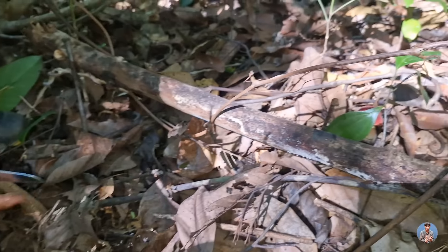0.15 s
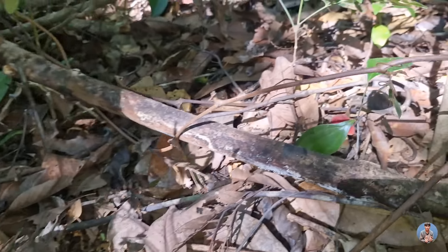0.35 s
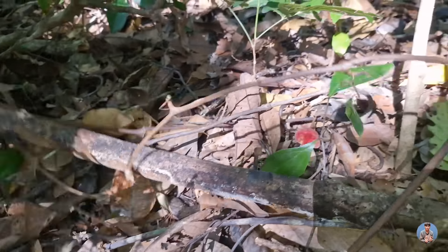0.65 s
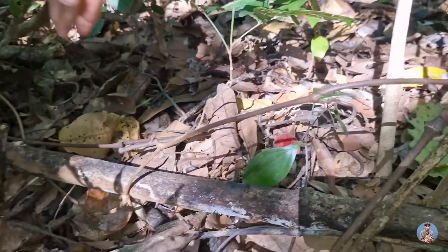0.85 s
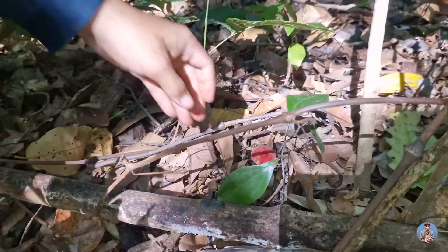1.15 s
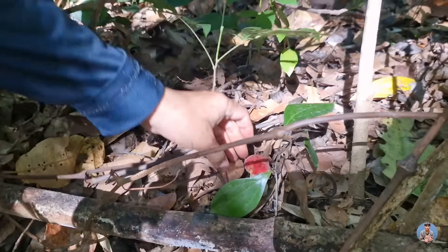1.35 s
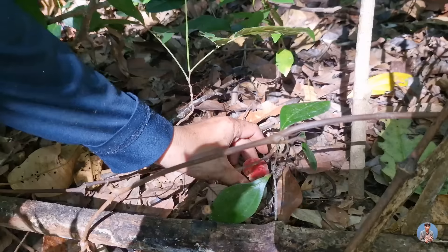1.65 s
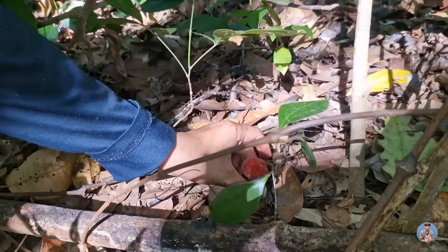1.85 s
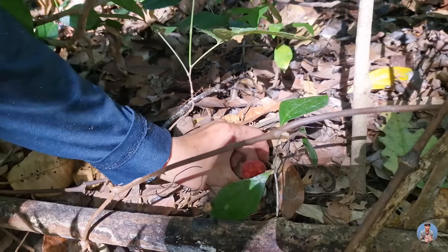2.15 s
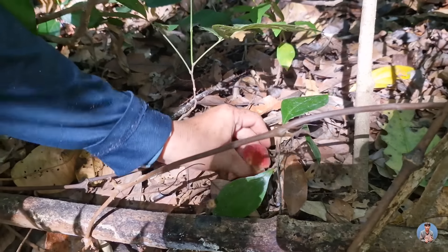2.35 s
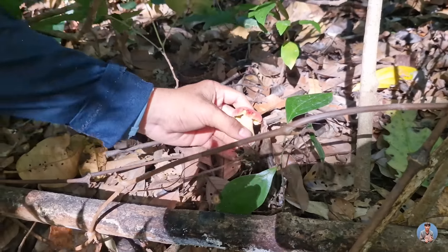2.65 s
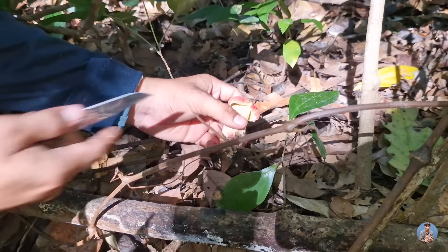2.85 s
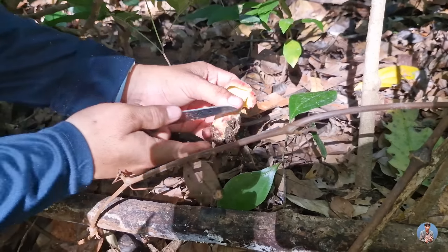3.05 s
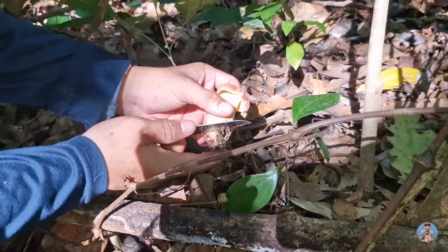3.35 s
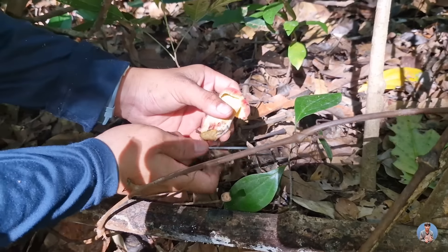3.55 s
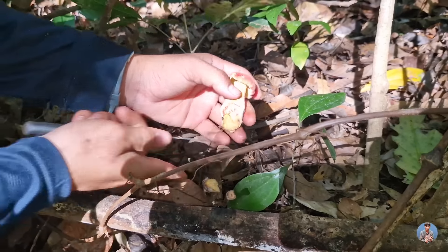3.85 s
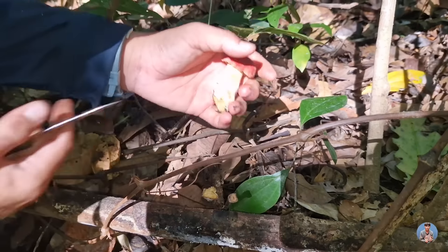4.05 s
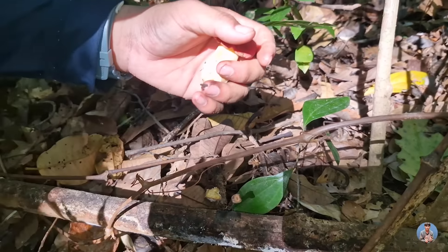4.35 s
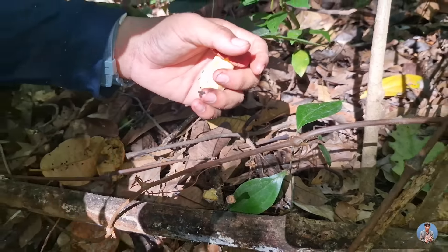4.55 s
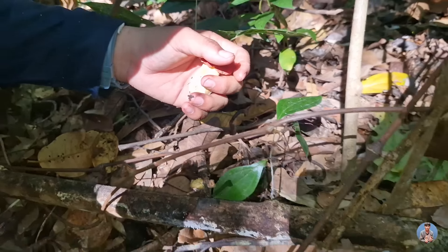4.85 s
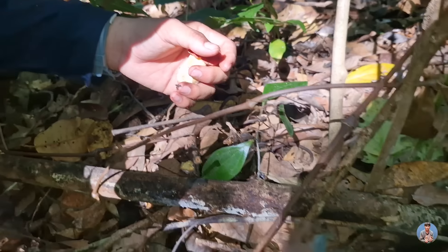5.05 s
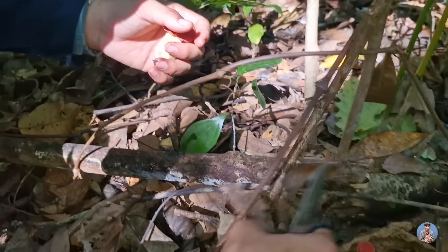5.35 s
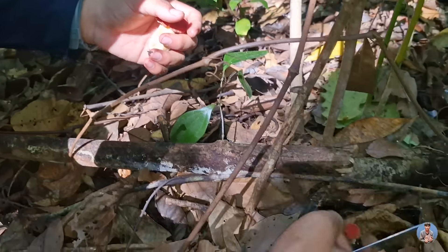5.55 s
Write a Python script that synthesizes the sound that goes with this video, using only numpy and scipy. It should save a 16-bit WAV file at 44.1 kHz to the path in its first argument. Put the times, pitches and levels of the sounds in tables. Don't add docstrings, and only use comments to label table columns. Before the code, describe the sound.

Outdoors under trees, brittle leaves rub, crackle and snap as hands pick at the ground. Tiny bright ticks, springing scraps and dull soil knocks punctuate the rustle. Activity thins after three seconds, a pulsing cicada and a steady hiss emerge, then hard crisp cracks resume near five seconds.

```python
import sys
import numpy as np
from scipy import signal
from scipy.fft import rfft, irfft, next_fast_len
from scipy.io import wavfile
from scipy.ndimage import uniform_filter1d, map_coordinates

SR = 44100
rng = np.random.default_rng(int(sys.argv[2]) if len(sys.argv) > 2 else 0)


def elevation(decibels):
    levels = np.asarray(decibels, float)
    return 10 ** (levels / 20)


def persist_wave(psi):
    counts = np.round(np.clip(psi, -1, 1) * 32767).astype(np.int16)
    wavfile.write(sys.argv[1], SR, np.atleast_2d(counts).T)


N = 250488
TIME = np.arange(N) / SR
SIDES = np.array([[.5], [-.5]])


def along(points, hz):
    point_hz, value = np.transpose(points)
    return np.interp(np.log(hz + 1), np.log(point_hz + 1), value)


def unit(x):
    return x / np.sqrt(np.mean(x ** 2) + 1e-20)


def curves(rows):
    s, *columns = np.transpose(rows)
    return [np.interp(TIME, s, column) for column in columns]


def wobble(rate):
    coarse = TIME[::32]
    knots = rng.standard_normal(int(N * 100 / SR))
    return np.interp(TIME, coarse, map_coordinates(knots, [coarse * np.clip(rate, .1, 95)]))


def filtered(x, response):
    size = next_fast_len(x.shape[-1] + 4096, real=True)
    spectrum = rfft(x, size) * response(np.fft.rfftfreq(size, 1 / SR))
    return irfft(spectrum, size)[..., :x.shape[-1]]


def shaped(spectrum):
    return lambda hz: elevation(along(spectrum, hz))


def peaks(modes):
    def response(f):
        total = 0
        for centre, width, db in modes:
            damping = (f * width) ** 2
            total = total + elevation(db) * (damping / ((centre ** 2 - f ** 2) ** 2 + damping)) ** 1.5
        return total
    return response


# pitch_hz, likeness (0 to 1)
LIKENESS = [(60, 0.69), (300, 0.81), (700, 0.87), (1400, 0.58), (3000, 0.13), (6000, 0.066), (12000, 0.025)]


def rush(response, lead=9.96):
    size = next_fast_len(N, real=True)
    hz = np.fft.rfftfreq(size, 1 / SR)
    a, b, c, d = rng.standard_normal((4, len(hz)))
    turn = np.arccos(np.clip(along(LIKENESS, hz), -1, 1)) / 2
    pair = np.cos(turn) * (a + 1j * b) + 2 * SIDES * np.sin(turn) * (c + 1j * d)
    pair *= response(hz) * np.exp(2j * np.pi * hz * lead / SR * SIDES)
    return unit(irfft(pair, size)[:, :N])


def humps(times, sizes, lengths, rise=0.47, fall=0.28):
    t = np.arange(-lengths.max() * SR // 2, lengths.max() * SR * 3).astype(int)
    u = t / (lengths[:, None] * SR) - .36
    shape = np.where(u < 0, np.exp(-(u / rise) ** 2), np.exp(-np.abs(u) / fall))
    where = np.clip((times * SR).astype(int)[:, None] + t, 0, N)
    power = (sizes[:, None] ** 2 * shape).ravel()
    return np.sqrt(np.bincount(where.ravel(), power, N + 1)[:N])


def tone(s, hz, width_hz):
    pitch = hz[np.clip(np.searchsorted(s - .004, TIME) - 1, 0, None)]
    turn = np.exp(2j * np.pi * np.cumsum(pitch) / SR)
    a, b, c = filtered(rng.standard_normal((3, N)), lambda f: 1 / (1 + (f / width_hz) ** 4))
    return unit(np.real(turn * (a + 1j * np.array([b, c]))))


def halves(x):
    x = unit(x)
    split_hz = 7500
    dull = filtered(x, lambda hz: 1 / (1 + (hz / split_hz) ** 8))
    return dull, (x - dull) * elevation(-1.5 * SIDES)


# pitch_hz, level_db (per Hz)
RUMBLE_COLOUR = [(15, -39), (25, -4), (54, 10.5), (91, -5), (119, 5), (173, -5), (200, -5.5), (260, -10.5),
                 (440, -120)]
# pitch_hz, level_db (per Hz)
HUSH_COLOUR = [(90, -5.5), (150, -12.5), (600, -15), (1500, -20), (4000, -15), (10500, -23), (13400, -28),
               (16000, -26)]
# start_s, level_db
WEIGHT_SHIFTS = [
    (0.0, -39),
    (0.255, -61),
    (0.285, -32),
    (0.345, -50),
    (0.54, -33.5),
    (0.9, -50.5),
    (4.56, -55),
    (4.6, -48.5),
    (5.68, -51),
]


def forest():
    rumble_db = curves(WEIGHT_SHIFTS)[0] + 2.0 * wobble(31)
    rumble = elevation(rumble_db) * rush(shaped(RUMBLE_COLOUR), lead=3.0)
    hush_db = -55.0 + 1.5 * wobble(2.66)
    return rumble + elevation(hush_db) * rush(shaped(HUSH_COLOUR), lead=3.0)


# pitch_hz, width_hz, level_db
PULSER_NOTES = [(2250, 900, -6), (2640, 670, -2)]
# pitch_hz, width_hz, level_db
HISSER_NOTE = [(6000, 650, 0)]
# start_s, level_db
CHORUS_LEVEL = [
    (0, -49),
    (1.5, -53),
    (2.3, -55),
    (3.1, -61),
    (3.7, -55.5),
    (3.95, -47),
    (4.6, -47.5),
    (5.68, -59),
]


def cicadas():
    phase = ((TIME - 3.995) * 4.22) % 1

    def pulse(swell, fade):
        return 0.16 + (1 - np.exp(-phase / swell)) * np.exp(-(phase / fade) ** 2)

    buzz_db = 2.2 * wobble(80)
    low, high = (rush(peaks([note]), lead=2.0) for note in PULSER_NOTES)
    notes = elevation(2.5) * pulse(0.12, 0.6) * low + elevation(0.5) * pulse(0.028, 0.49) * high
    pulser = unit(elevation(buzz_db)) * notes
    waver_db = 1.8 * wobble(9)
    hisser = elevation(-5.5 + waver_db) * rush(peaks(HISSER_NOTE), lead=1.7)
    return elevation(curves(CHORUS_LEVEL)[0]) * (pulser + hisser)


def rings(times, sizes, hz, cycles, lag):
    t = np.arange(96) / SR
    out = []
    for side, size in zip((.5, -.5), sizes):
        decay = np.exp(-t * hz[:, None] / cycles)
        wave = size[:, None] * np.sin(2 * np.pi * hz[:, None] * t) * decay
        start = (times * SR - side * lag).astype(int)[:, None] + np.arange(len(t))
        out.append(np.bincount(np.clip(start, 0, N).ravel(), wave.ravel(), N + 1)[:N])
    return np.array(out)


# pitch_hz, level_db (per Hz)
LEAF_COLOUR = [(1000, -27), (1780, -13.5), (1970, -6.5), (2250, -2), (2600, -6.5), (3220, -4), (4460, 0),
               (6710, -4), (8780, -3.5), (10600, -8.5), (13100, 1), (14000, -4), (15600, -12)]


def crackle(share_db, cycles, spread_db):
    when, strength, pitch, place = rng.random((7000, 4)).T
    size = elevation(-spread_db * np.log(strength + .004)) * elevation(SIDES * 16 * (place - .5))
    cracks = rings(when * N / SR, size, 1800 * 8 ** pitch, cycles, lag=6 + 8 * place)
    grains = unit(filtered(cracks, shaped(LEAF_COLOUR)))
    return rush(shaped(LEAF_COLOUR)) + elevation(share_db) * grains


def patchy(x, depth_db):
    z = signal.stft(x, nperseg=256)[2]
    field = uniform_filter1d(rng.standard_normal(z.shape[1:]), size=9, axis=0)
    field = uniform_filter1d(field, size=14, axis=1)
    return signal.istft(z * elevation(depth_db * unit(field)), nperseg=256)[1][:, :N]


# start_s, rustle_db, weight_db
BUSY_HANDS = [(0.0, -43, 4), (0.6, -27.5, 2), (0.94, -32, -2.5), (1.25, -27, -4), (1.5, -34, 9),
              (1.69, -40.5, 3), (2.01, -42, 1), (2.27, -40, 1.5), (2.45, -25.5, -1.5), (2.79, -34.5, -1.5),
              (3.11, -37, -5.5), (3.36, -51.5, -2), (3.7, -54, 4.5), (3.76, -32, -1.5), (4.09, -47, -3),
              (4.36, -47.5, -6), (4.65, -35, -0.5), (5.68, -30.5, 1)]
# full_contact_s, hold_s, rustle_db, body_db and soil_db (both over the rustle)
HAND_STROKES = [(0.302, 0.16, -28, -11, -3.5), (0.526, 0.21, -16.5, -9.5, -8.5),
                (0.743, 0.058, -32, 3.5, 4), (1.322, .13, -23, -8, -9.5), (1.534, 0.012, -27.5, 1.5, -17),
                (1.823, 0.05, -32, -3, -22), (1.95, 0.014, -40.5, 7, -19), (2.066, 0.026, -31.5, -1, -12),
                (2.18, 0.021, -39, 11, -2), (2.38, 0.17, -28.5, -2.5, -8.5), (2.893, 0.033, -23.5, -5, -12),
                (3.031, 0.048, -30.5, -6.5, -9.5), (3.255, 0.044, -42.5, -9.5, -7),
                (3.402, 0.1, -41, -9, -15), (3.592, 0.04, -40, -10, -16), (3.744, 0.016, -33, -7, -29),
                (4.7, 0.05, -28, -2.5, -32), (4.828, .1, -20.5, -3.5, -18), (4.929, 0.14, -16, -9.5, -14.5),
                (5.067, 0.043, -26.5, -5, -11), (5.13, 0.13, -18.5, -4, -10),
                (5.306, 0.12, -21.5, -10, -4.5), (5.493, 0.018, -37.5, -13, 6), (5.653, .06, -25.5, 2, -3)]


def stir():
    press_db_per_s, lift_db_per_s = 409, 273
    busy_body_db, busy_soil_db = -3.5, -7.5
    busy_db, weight_db = curves(BUSY_HANDS)
    s, hold, db, body_db, soil_db = np.transpose(HAND_STROKES)[..., None]
    before = np.maximum(s - TIME, 0)
    after = np.maximum(TIME - s - hold, 0)
    stroke_db = db - press_db_per_s * before - lift_db_per_s * after
    stroke, busy = elevation(2 * stroke_db).T, elevation(2 * busy_db)
    total = busy + stroke.sum(axis=1)

    def blend(steady_db, each_db):
        power = busy * elevation(2 * (steady_db + weight_db)) + stroke @ elevation(2 * each_db[:, 0])
        return 10 * np.log10(power / total)

    body, soil = blend(busy_body_db, body_db), blend(busy_soil_db, soil_db)
    bright_db = -2 - 0.67 * (body - busy_body_db)
    return 10 * np.log10(total), body, soil, bright_db


# pitch_hz, level_db (per Hz)
BODY_COLOUR = [(400, -12), (650, -1), (1100, -1.5), (1800, -1.5), (2400, -17)]
# pitch_hz, level_db (per Hz)
SOIL_COLOUR = [(100, -18), (160, -11), (300, -2.5), (560, -9), (800, -17)]
# start_s, left_right_db
HAND_PLACE = [
    (0.0, -0.5),
    (2.5, 0),
    (3.27, -2),
    (5.68, -1.5),
]


def rustle():
    rustle_db, body_db, soil_db, bright_db = stir()
    clumps = unit(elevation(2.1 * wobble(90) + .8 * wobble(25)))
    dull, bright = halves(patchy(crackle(share_db=-7, cycles=1.35, spread_db=3.0), depth_db=1.74))
    top = elevation(-.4 * bright_db) * dull + elevation(0.45 * bright_db - 1.0) * bright
    when, strength, length = rng.random((500, 3)).T
    catches = humps(when * N / SR, elevation(1 - 1.6 * np.log(strength + .04)), .0006 + .0015 * length)
    top_db = rustle_db - 2.0 + SIDES * curves(HAND_PLACE)[0]
    top = elevation(top_db) * clumps * np.hypot(1, catches) * top
    flex = unit(clumps * elevation(2.5 * wobble(40)) * rush(shaped(BODY_COLOUR), lead=6.5))
    body = elevation(rustle_db + body_db - 2.5) * flex
    shift = unit(clumps ** 0.61 * elevation(0.8 * wobble(25.017)) * rush(shaped(SOIL_COLOUR), lead=5))
    return top + body + elevation(rustle_db + soil_db - 0.5) * shift


# start_s, peak_db, pitch_hz
SOIL_THUDS = [(0.001, -31, 299.6), (0.022, -27, 380), (0.07, -31, 283), (0.118, -30, 450),
              (0.268, -28.5, 134.1), (0.521, -11.5, 301), (0.713, -15, 617), (1.327, -33, 668),
              (1.404, -17, 519), (1.606, -34, 432.5), (1.713, -33, 430), (1.927, -33.5, 335.3),
              (2.389, -18, 664), (2.56, -24.5, 556), (2.815, -44, 633), (3.047, -37, 129.7),
              (3.257, -35, 320), (3.784, -33.5, 294), (3.896, -31, 323.6), (4.688, -25, 511),
              (4.773, -23.5, 350), (5.36, -18, 290.8), (5.512, -19, 324.7), (5.59, -24, 335)]


def thuds():
    s, db, hz = np.transpose(SOIL_THUDS)
    swell = humps(s + 0.006, elevation(db), 3.6 / hz + 0.0041)
    knock = elevation(-12.5) * tone(s, hz, width_hz=14.0)[0]
    puff = elevation(-8.0) * rush(shaped(SOIL_COLOUR), lead=5.6)
    return swell * (knock + puff)


def even(x):
    power = uniform_filter1d(np.mean(x ** 2, axis=0), size=90)
    return x / np.sqrt(np.abs(power) + .1)


# start_s, level_db, length_ms, pitch_hz
EDGE_TICKS = [(.318, -20.5, 3.7, 3920), (.521, -15.5, 8.5, 2370), (.712, -17.5, 25, 820),
              (.873, -17.5, 5.6, 4820), (.966, -19, 4.1, 8230), (1.716, -34, 1.3, 9470),
              (1.828, -26, 1.2, 7150), (1.869, -14.5, 2.3, 9350), (2.618, -22.5, 4.3, 9430),
              (2.671, -31, 2.8, 9220), (2.697, -35, 4, 9350), (2.715, -29.5, 17, 1030),
              (2.819, -24, 1.4, 7000), (3.063, -20.5, 4.2, 8010), (3.254, -39, 2.7, 5380),
              (3.453, -29.5, 6.6, 8960), (3.496, -31.5, 4, 9470), (3.523, -38, 7.8, 1770),
              (3.619, -35, 1.6, 8180), (3.827, -30, 2.5, 5600), (3.925, -33, 2.9, 6420),
              (4.257, -36.5, 5, 2580), (5.069, -15, 1.4, 9470), (5.318, -21, 5.1, 820),
              (5.391, -14.5, 6.5, 9090), (5.406, -16, 2.5, 9470), (5.43, -36, 2.4, 8530),
              (5.442, -19, 2.4, 9470), (5.551, -24, 6.8, 1290)]
# start_s, level_db, length_ms, pitch_hz
LEAF_CRACKS = [(.178, -28.5, 10, 2200), (.539, -17.5, 22, 2150), (.61, -11.5, 5.6, 2200),
               (.667, -12.5, 3.1, 4500), (.546, -12, 1.5, 2100), (.703, -17, 1.5, 12500),
               (1.402, -19, 3.3, 3900), (5.209, -13, 1.2, 5100), (5.22, -15, 11, 5000),
               (.681, -23, 3.5, 9470), (.826, -27.5, 37, 4180), (.987, -21, 4.9, 4910),
               (1.07, -27.5, 8.7, 2110), (1.096, -21.5, 2.9, 860), (1.196, -26, 7.3, 950),
               (1.209, -17, 6, 8010), (1.735, -12.5, 0.85, 5040), (1.786, -25.5, 2.96, 4570),
               (1.963, -15.5, 3.5, 4610), (2.156, -25.5, 20.5, 5210), (3.051, -20, 5.4, 860),
               (3.585, -31, 6.5, 5300), (4.422, -37, 5.9, 1400), (4.43, -24.5, 3.3, 8230),
               (4.75, -10.5, 5.3, 4350), (4.828, -13.5, 1.1, 1030), (5.002, -6, 0.99, 4520),
               (5.588, -19, 1.6, 1720), (5.656, -16, 12, 4820)]
# start_s, level_db, length_ms, pitch_hz
LEAF_FOLDS = [(.264, -22.5, 6.7, 1993), (.367, -27.5, 54, 4950), (.436, -26, 7.5, 5612),
              (1.329, -13, 16, 2327), (1.415, -16, 3.7, 3913), (1.841, -16, 4.3, 3963),
              (2.057, -24.5, 5.1, 6000), (2.394, -15.5, 17, 1162), (2.487, -18.5, 7.8, 4830),
              (2.825, -18.5, 3.7, 1920), (2.918, -20.5, 7.6, 4870), (3.669, -27.5, 3.4, 4616),
              (4.584, -29.5, 6.6, 1986), (4.673, -20, 8.1, 4896), (4.714, -15, 6.7, 7210),
              (4.735, -17, 4.8, 4390), (4.776, -19.5, 11.1, 4520), (4.853, -12, 13.7, 4500),
              (4.915, -16.5, 5.7, 2110), (5.022, -14.5, 29, 4130), (5.367, -15, 15.1, 2450),
              (5.628, -11.5, 4.3, 5310)]
# start_s, level_db, length_ms, pitch_hz
TWIG_BREAKS = [(1.123, -21, 13, 2205), (1.339, -7.5, 6.4, 7180), (1.363, -22, 3.1, 3620),
               (1.538, -16, 3.3, 4960), (1.562, -14, 3.6, 2523), (1.609, -15.5, 5.5, 2704),
               (1.72, -17.5, 5.3, 1468), (1.932, -16.5, 0.94, 2450), (2.0375, -14, 2.2, 3000),
               (2.182, -24, 3.8, 1377), (2.192, -23.5, 8.5, 1659), (2.206, -18.5, 7.9, 1495),
               (2.465, -12.5, 1.33, 3525), (2.563, -22.5, 12.6, 992), (2.877, -34, 3.7, 3444),
               (3.729, -27, 12.2, 4070), (4.001, -33.5, 4.2, 774), (4.148, -37, 2.7, 2710),
               (4.48, -33, 9.5, 2787), (4.903, -15, 5.4, 2770), (5.056, -9.5, 3.25, 4180),
               (5.139, -20, 9.9, 1640), (5.185, -13, 25, 4890), (5.266, -13, 6.8, 2374),
               (5.519, -20.5, 2.6, 2386)]


def contacts():
    # brightness dB, body dB over level, first break dB over level
    kinds = ((EDGE_TICKS, (7.2, -15, 1)), (LEAF_CRACKS, (-0.8, -18, 1.6)),
             (LEAF_FOLDS, (0.59, -9, 0)), (TWIG_BREAKS, (-7, -12, 2)))
    return np.transpose(sorted((*row, *colour) for rows, colour in kinds for row in rows))


def snaps():
    s, db, length_ms, hz, bright_db, body_db, break_db = contacts()
    length = np.clip(length_ms, .8, 30) / 1000
    first_fibre_s = np.full(len(s), 0.00063)

    def splinter(level):
        first = humps(s, elevation(level + break_db - .7 * length_ms), first_fibre_s)
        after_rustle = elevation(-17) * humps(s, elevation(level), length + .012)
        return np.hypot(first, humps(s, elevation(level), length)) + after_rustle

    dull, bright = halves(even(rush(shaped(LEAF_COLOUR))))
    top = elevation(-4.0) * splinter(db - 0.14 * bright_db) * dull
    top = top + elevation(-4.0) * splinter(db + 0.73 * bright_db) * bright
    ring_swell = humps(s, elevation(db - 0.047 * np.abs(bright_db)), length + 0.0023)
    ring = elevation(-8.0) * ring_swell * even(tone(s, hz, width_hz=480))
    body_swell = humps(s, elevation(db + body_db), length + 0.0032)
    body = elevation(0.5) * body_swell * even(rush(shaped(BODY_COLOUR)))
    return elevation(SIDES * curves(HAND_PLACE)[0]) * (top + ring) + body


def pops(rows, level_db, cycles, rise):
    s, db, hz, pan_db = np.transpose(rows)[..., None]
    t = np.arange(-96, 224) / SR
    life = cycles / hz + 0.000089
    shape = np.where(t < 0, np.exp(-(t / (rise * life)) ** 2), np.exp(-np.abs(t) / life))
    phase, detune, apart = rng.random((len(s), 3)).T[..., None]
    where = np.clip((s * SR).astype(int) - 96 + np.arange(len(t)), 0, N).ravel()
    out = []
    for side in (.5, -.5):
        turn = 2 * np.pi * (hz * (t + side * 10 / SR) + phase + side * apart * hz / 8000)
        wave = np.sin(turn) + .6 * np.sin(turn * (1.1 + .25 * detune))
        sized = elevation(db + level_db + side * pan_db) * shape * wave
        out.append(np.bincount(where, sized.ravel(), N + 1)[:N])
    return np.array(out)


# start_s, peak_db, pitch_hz, left_right_db
SCRAP_PINGS = [(0.2617, -24, 2500, -18), (0.2651, -23, 1510, -14), (0.2679, -24.5, 3000, -17),
               (0.988, -16, 5600, 4.8), (1.0973, -37, 980, 8), (1.0975, -16, 4280, 9),
               (1.3312, -13, 2530, 7.1), (1.3651, -7, 3860, -9), (1.5308, -15, 4280, -13),
               (1.5637, -15.9, 2550, -4.8), (1.6098, -15, 3000, 0.7), (1.6103, -30, 5550, -6),
               (1.6103, -12.5, 1158, 12), (1.7211, -24, 1390, 0), (1.7213, -12, 3930, -6.2),
               (1.7351, -17, 4670, 4), (1.8291, -27, 4300, 1.6), (1.8433, -27, 1180, -4),
               (1.9321, -30, 3930, -2.0), (1.9635, -16, 5090, -8), (1.9645, -29, 2130, 0),
               (1.9698, -16, 3300, -2.3), (2.0374, -15.5, 2780, -2), (2.194, -22, 4280, -3),
               (2.1945, -26, 1510, -4), (2.2017, -28, 1510, 1), (2.2097, -15.5, 3340, 8),
               (2.3938, -13, 1650, 4), (2.3976, -20, 3010, 11.2), (2.3985, -16.4, 1070, 5),
               (2.4028, -13, 1510, -4), (2.4656, -12.7, 3930, -12), (2.8253, -29, 3030, -0.5),
               (2.9224, -21, 5130, -1), (3.0518, -25.2, 2330, 10.7), (3.5876, -36, 3040, -10.9),
               (3.6702, -22, 4550, 1), (3.7385, -29, 3605, -5.6), (4.4247, -31, 1390, 13),
               (4.4317, -27, 3237, 8.3), (4.5893, -35, 1980, -7.9), (4.6714, -23, 1380, 0),
               (4.6751, -12.5, 5090, 2.5), (4.751, -7, 4290, -9), (4.7542, -10.9, 4300, 4),
               (4.8582, -16, 4300, -2.0), (5.0568, -2, 4667, 0.0), (5.5192, -11.5, 3950, 1.5),
               (5.5195, -22, 1270, 5.9), (5.629, -21, 1390, 11.5)]


def pings():
    return pops(SCRAP_PINGS, level_db=-3.5, cycles=1.2, rise=1.2)


# start_s, peak_db, pitch_hz, left_right_db
FIBRE_SPITS = [(0.3203, -10.9, 11300, -1), (0.6827, -2, 9000, 2.4), (0.8738, -19, 13200, -4),
               (0.9678, -19, 9340, 0), (1.095, -17, 7170, 3.3), (1.0975, -14, 14400, -5.3),
               (1.1242, -16, 8500, -0.1), (1.3405, -12, 7200, 1), (1.6108, -25, 14400, -7.3),
               (1.6131, -21, 6050, -3.5), (1.6136, -21.9, 14400, -8.4), (1.7173, -19, 9400, -3.2),
               (1.7208, -26, 14360, -12.1), (1.7346, -16, 11700, -10.3), (1.8249, -22.0, 12000, -8.9),
               (1.8291, -22.3, 8560, 4.6), (1.8423, -12, 6050, 6.0), (1.8688, -10, 12120, -10.3),
               (1.9321, -29, 13300, -14), (1.963, -15.0, 14100, -12.1), (2.0379, -15, 6000, -2),
               (2.3946, -10.5, 8400, -9), (2.6183, -19.8, 9350, -4.7), (2.6712, -18, 10200, -8.8),
               (2.8203, -28, 9240, -9.6), (2.8256, -20.6, 9340, -6.6), (3.0645, -14.6, 6050, 2),
               (3.2337, -33.6, 14350, -8.9), (3.2531, -29, 12110, -12.9), (3.4507, -26.2, 14100, -19.1),
               (3.4544, -29, 14260, -18.9), (3.4581, -30, 10220, -15), (3.4978, -25.6, 14360, -9.7),
               (3.5911, -37, 14440, -20.0), (3.6203, -28.7, 14400, -15.5), (3.6707, -28.7, 14400, -3.6),
               (3.7295, -24.5, 11070, -18), (3.9258, -28.1, 14400, -2.5), (4.2588, -29.0, 14350, -13.5),
               (4.4324, -21, 8530, -1), (4.7071, -14, 10240, -4.5), (4.7138, -11, 7840, -5),
               (4.8592, -8, 9260, -11.1), (5.0615, -5.5, 13200, -12.0), (5.0712, -6.2, 12030, -11.7),
               (5.4047, -10, 11010, -16), (5.4072, -10, 11100, -14.7), (5.4421, -9, 11900, -22),
               (5.63, -9, 6040, 5), (5.6302, -5, 14390, -12.5)]


def spits():
    return pops(FIBRE_SPITS, level_db=-3, cycles=2.5, rise=1.54)


# start_s, length_s, level_db, first_pitch_hz, last_pitch_hz
LEAF_DRAGS = [(0.519, 0.052, -22, 2100, 2187), (.585, 0.095, -30.5, 620, 700),
              (0.589, .04, -33, 2250, 2250), (0.658, 0.057, -23, 4700, 4300),
              (.69, 0.039, -27, 12500, 13300), (1.43, 0.039, -29.5, 4090, 4010),
              (2.459, 0.045, -31, 950, 990), (3.869, 0.14, -52, 482, 523), (4.892, .04, -29, 12980, 13200),
              (4.994, 0.07, -23, 8800, 8020), (5.101, 0.14, -23, 4320, 5170), (5.17, .07, -43, 1500, 1400),
              (5.36, 0.048, -32, 12500, 12000), (5.488, 0.035, -26.5, 11540, 11100),
              (5.645, .03, -30, 3700, 4280)]


def drags():
    out = np.zeros((2, N))
    for s, length, db, first_hz, last_hz in LEAF_DRAGS:
        u = np.linspace(0, 1, int(np.clip(length, .01, .2) * SR))
        a, b, c, grit = rng.standard_normal((4, SR // 4))[:, :len(u)]
        width_hz = 0.11 * first_hz + 60
        a, b, c = filtered(np.array([a, b, c]), lambda f: 1 / (1 + (f / width_hz) ** 4))
        turn = np.exp(2j * np.pi * np.cumsum(first_hz + (last_hz - first_hz) * u) / SR)
        grain = elevation(2.9 * unit(uniform_filter1d(grit, size=100)))
        song = unit(grain * np.real(turn * (a + 1j * np.array([b, c]))))
        song = elevation(db) * np.sqrt(np.sin(np.pi * u) + 1e-9) * song
        part = out[:, int(s * SR):][:, :len(u)]
        part += song[:, :part.shape[1]]
    return out


# start_s, left_lag_ms
HAND_LAG = [
    (0.0, -.22),
    (.9, -.2),
    (1.1, -.06),
    (4.4, -.1),
    (4.6, .3),
    (5.68, .27),
]


def scene():
    left, right = rustle() + thuds() + snaps() + pings() + spits() + drags()
    late = np.arange(N) - np.round(curves(HAND_LAG)[0] * SR / 1000).astype(int)
    hands = np.array([left[np.clip(late, 0, N - 1)], right])
    return forest() + cicadas() + hands


def top_cut(x):
    return signal.sosfilt(signal.butter(12, 16510, fs=SR, output="sos"), x)


# pitch_hz, left_right_db
PORT_TILT = [(40, -4.5), (120, 1), (400, 1.5), (2000, 0.5), (15000, -3.5)]


def record(dry):
    def microphone(hz):
        treble_limit = np.where(hz < 15850, 1, elevation(-39))
        bass_cut = 1 + (42 / (hz + 1)) ** 4
        return elevation(SIDES * along(PORT_TILT, hz)) * treble_limit / bass_cut

    x = filtered(dry, microphone)
    return top_cut(x / (1 + np.abs(x) ** 6) ** (1 / 6))


dry = scene()
out = record(dry)
persist_wave(out)
```